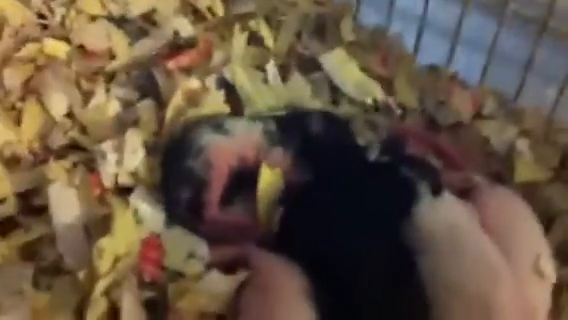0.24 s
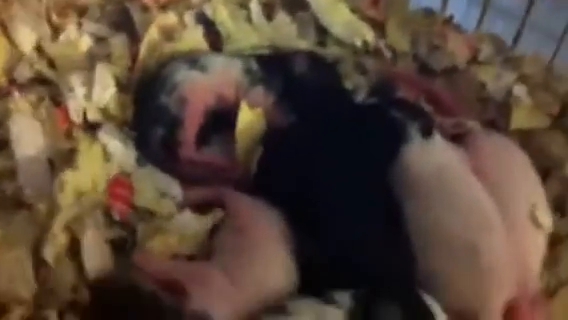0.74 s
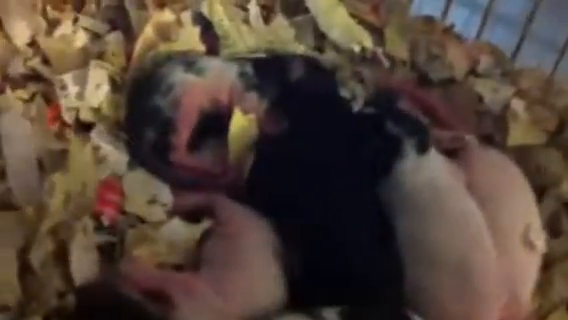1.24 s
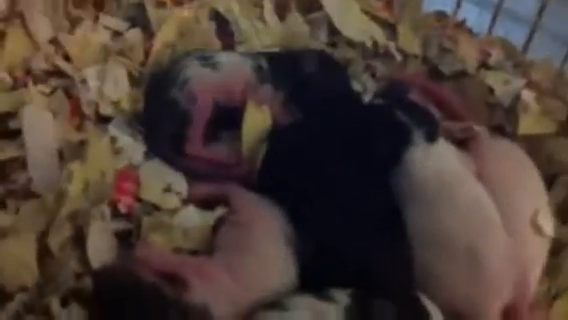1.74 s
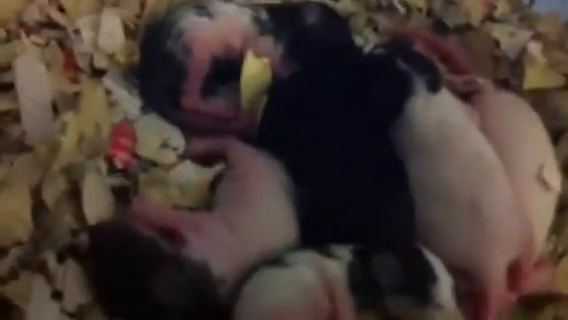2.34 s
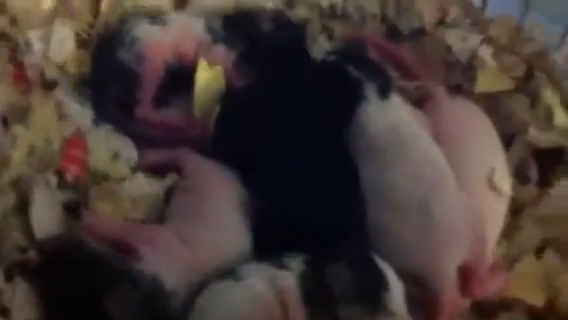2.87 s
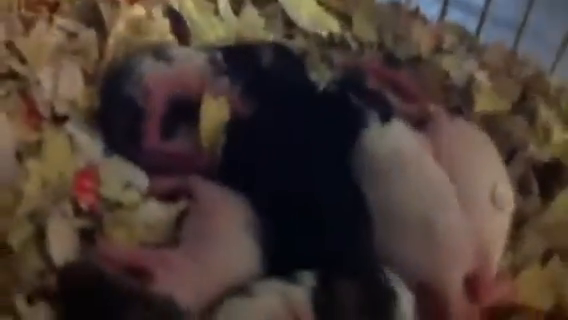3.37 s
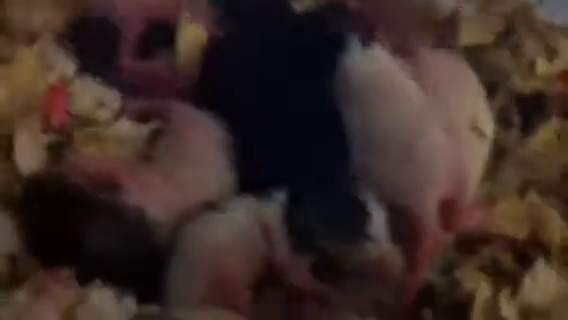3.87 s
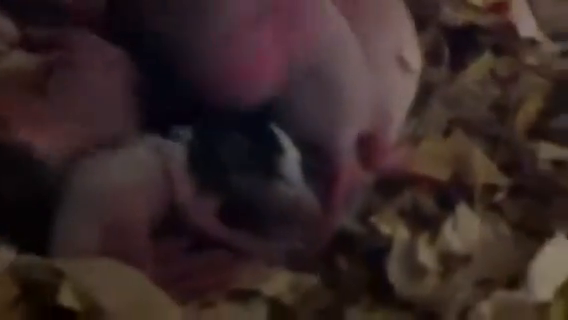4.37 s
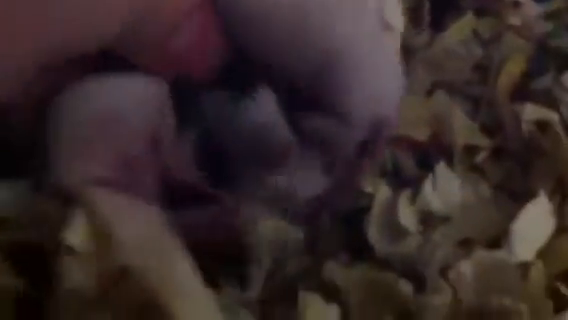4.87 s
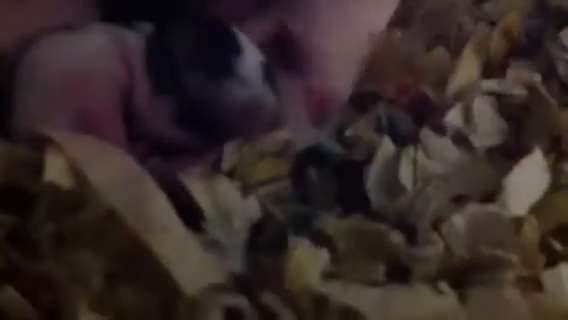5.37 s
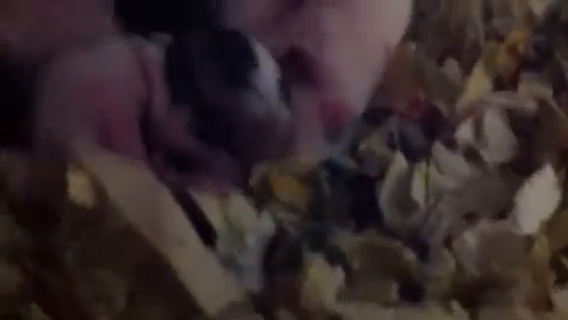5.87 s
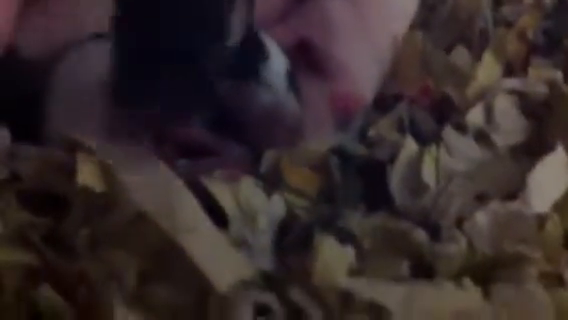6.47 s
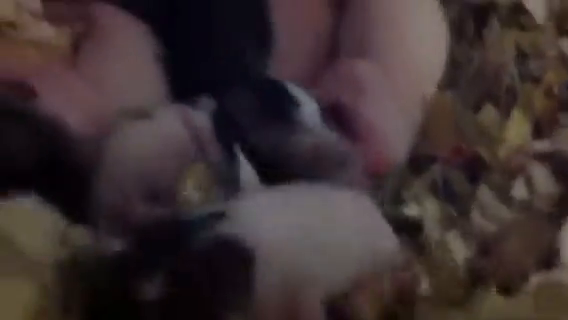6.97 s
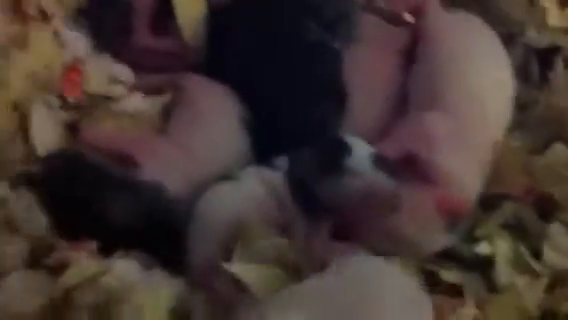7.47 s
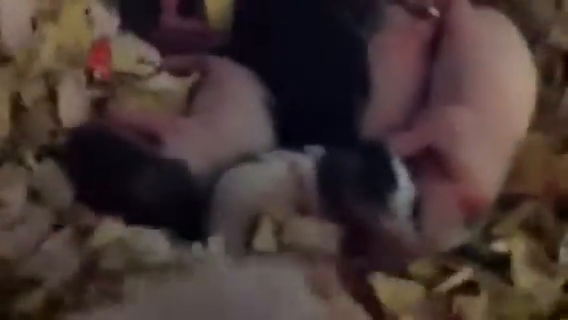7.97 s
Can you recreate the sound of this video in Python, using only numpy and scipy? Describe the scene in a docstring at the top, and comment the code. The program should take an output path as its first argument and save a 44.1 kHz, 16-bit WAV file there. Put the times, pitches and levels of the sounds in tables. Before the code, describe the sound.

Raspy little squeaks from a baby rat burst out around one and four seconds, amid papery scuffs, soft hand rubs, thuds and faint room drone.

```python
"""Four hoarse squeals of a rat pup, each breaking upwards in pitch, over a nest of rustling paper.
The voice mixes a clear harmonic tone with rasping, chaotic closures and air, coloured by the throat.
Shredded paper stirs and scuffs as tiny slips, among dry clicks of noise; a hand rubs with hollow rings.
Dull knocks strike the resonances of the wire cage floor, and a low steady hum drones in the small room."""
import sys
import numpy as np
from scipy import signal
from scipy.fft import rfft, irfft, next_fast_len
from scipy.io import wavfile
from scipy.ndimage import uniform_filter1d

SR = 44100
rng = np.random.default_rng(int(sys.argv[2]) if len(sys.argv) > 2 else 0)


def persist_wave(psi):
    """Save psi, clipped to +-1, as 16-bit WAV."""
    counts = np.round(np.clip(psi, -1, 1) * 32767).astype(np.int16)
    wavfile.write(sys.argv[1], SR, np.atleast_2d(counts).T)


N = 362061
TIME = np.arange(N) / SR  # s

# squeals: [t/s, held/s, level/dB, swell/dB (negative starts loud), release/dB per s,
# low pitch f/Hz, top pitch f/Hz, glide/s, hoarseness/0-1 at the onset, at the break, at the top]
SQUEALS = [(1.057, 0.13, -24.5, 2, 677, 1050, 1241, .03, 0.94, 0.64, 0.86),
           (1.309, 0.1, -25.5, -2, 237, 1053, 1146, .014, 0.47, 0.97, 0.79),
           (3.897, 0.13, -22, 7, 901, 1078, 1258, .016, 0.72, 0.82, 0.73),
           (4.326, 0.17, -21, 10, 540, 992, 1201, .036, 0.83, 0.83, 0.43)]
# colour of the rasp in the throat: [f/Hz, level/dB per Hz]
RASP_COLOUR = [(500, -47), (780, -40.5), (950, -17.5), (1150, -25.5), (1580, -8.5), (2000, -14),
               (2450, -6.5), (3100, -3.5), (3900, -4.5), (4800, -2.5), (5800, -5.5), (7500, -11.5),
               (8300, -10), (11300, -11.5), (13000, -25), (15800, -24)]
# narrow throat resonances that flare: [f/Hz, width/Hz, level/dB]
THROAT_MODES = [(1510, 180, -27), (2900, 430, -0.5), (4460, 330, -15.5), (4900, 22, 2), (6820, 140, -0.5),
                (7360, 200, 1)]
# harmonics of the clear tone, from the first up: [level/dB]
HARMONICS_DB = [-26.5, -6.5, -1.5, 3, -6.5, -9, -15, -12.5, -11, -18.5]
ATTACK_S, ATTACK_DB, SWELL_S = 0.0092, 31, 0.018
BREAK_S, RELEASE_S = 0.038, 0.055  # the pitch stays low until the break
SLIP_HOARSENESS, SLIPS_PER_S = 0.059, 33  # chance slips between clear and hoarse
RELEASE_HOARSENESS = 0.49  # the voice frays as it dies


def squeal(start, held, full_db, swell_db, release, low_hz, top_hz, glide,
           hoarse_onset, hoarse_break, hoarse_top,
           waver=0.005, jitter=0.014, chaos=0.08, air_share=0.62, clarity_db=3.5):
    """The vocal folds slip between a clear tone and chaotic flapping, with air hissing through each opening."""
    age = TIME[:int((held + RELEASE_S) * SR)]
    size = len(age)
    dying = np.maximum(age - held, 0)
    level_db = full_db - ATTACK_DB * np.maximum(1 - age / ATTACK_S, 0)
    level_db = level_db - swell_db * np.exp(-age / SWELL_S) - release * dying

    # after the break, pitch and hoarseness glide together to their top values
    climb = 1 - np.exp(-np.maximum(age - BREAK_S, 0) / glide)
    pitch = low_hz + (top_hz - low_hz) * climb
    pitch = pitch * (1 + waver * wander(50, size))
    hoarse = np.interp(age, [0, BREAK_S], [hoarse_onset, hoarse_break])
    hoarse = hoarse + (hoarse_top - hoarse_break) * climb
    hoarse = hoarse + RELEASE_HOARSENESS * dying / RELEASE_S
    hoarse = np.clip(hoarse + SLIP_HOARSENESS * wander(SLIPS_PER_S, size), 0.02, 0.98)

    flutter_db, shake_db = 3.5, 1.3  # of each harmonic, of the whole voice
    cycles = np.cumsum(pitch * (1 + jitter * hoarse * wander(565, size))) / SR
    tone = np.zeros(size)
    for k, db in enumerate(HARMONICS_DB, 1):
        harmonic = np.sin(2 * np.pi * (k * cycles + rng.random()))
        tone += from_db(db + flutter_db * wander(49, size)) * harmonic

    # chaotic closures come early or late, each with its own force
    flaps = np.cumsum(pitch * np.exp(chaos * wander(600, size))) / SR
    closures = np.diff(np.floor(flaps), prepend=0) * rng.rayleigh(1, size)
    air = rng.standard_normal(size) * (2 + np.cos(2 * np.pi * flaps))
    rasp = np.sqrt(1 - air_share) * rms_one(closures - closures.mean())
    rasp = rasp + np.sqrt(air_share) * rms_one(air)

    clear_voice = from_db(clarity_db) * np.sqrt(1 - hoarse) * rms_one(tone)
    voice = clear_voice + np.sqrt(hoarse) * coloured(rasp, RASP_COLOUR)
    voice = evened(voice + flaring(voice, THROAT_MODES, depth_db=4, rate=30))
    out = np.zeros(N)
    out[int(start * SR) + np.arange(size)] = from_db(level_db + shake_db * wander(74, size)) * voice
    return out


# restlessness of the nest, as the level of the stirring paper, in four stretches: [t/s, level/dB]
UNREST = [
    [(0.0, -53.5), (0.242, -61), (0.576, -54), (0.71, -59), (0.888, -59), (1.0, -57.5)],
    [(1.65, -60), (2.07, -58.5), (2.35, -64), (3.16, -68), (3.66, -61.5), (3.85, -57)],
    [(4.72, -58), (5.072, -58), (5.208, -60), (5.916, -67), (6.0, -64.5)],
    [(6.05, -68), (6.26, -59), (6.67, -61), (6.89, -57.5), (7.54, -57.5), (8.2, -58)],
]


def unrest_level():
    """Join the stretches of unrest into one level curve in dB."""
    seconds, level_db = np.transpose(np.vstack(UNREST))
    return np.interp(TIME, seconds, level_db)


# strokes that swell and fade in the paper: [t/s at the top, level/dB, half length/s]
STROKES = [(.02, -51, 0.036), (.168, -52.5, 0.028), (2.06, -50, 0.015), (2.59, -57.5, 0.036),
           (3.07, -54, 0.024), (3.71, -52.5, 0.022), (5.14, -58.5, 0.051), (5.455, -49.5, 0.0066),
           (6.06, -55, 0.022), (6.365, -55, 0.018), (6.66, -53.5, 0.025), (6.775, -44, 0.027),
           (6.86, -51, 0.029), (7.0, -49, 0.025), (7.23, -51.5, 0.05), (7.55, -47, 0.022),
           (7.86, -52.5, 0.043), (8.155, -52.5, 0.044)]
# sudden scuffs of paper, before the trim and bite: [t/s, level/dB]
SCUFFS = [(0.307, -46), (0.4183, -43), (0.4833, -38), (0.637, -40), (0.7916, -43.5), (0.9472, -40),
          (2.0827, -41.5), (2.248, -40.5), (2.401, -38.5), (2.733, -39.5), (2.8912, -40), (3.2246, -38),
          (3.3802, -40.5), (3.553, -46), (3.7793, -51), (5.055, -41), (5.3837, -41.5), (5.4051, -42),
          (5.685, -44), (5.8653, -42.5), (6.2105, -43.5), (6.499, -45.5), (6.893, -40), (8.13, -38.5)]
# colour of the stirring paper: [f/Hz, level/dB per Hz]
STIR_COLOUR = [(590, -8.5), (1000, -8.5), (1270, 0), (1460, 0), (3070, -0.5), (4380, 1), (5520, -1),
               (7120, 0), (8870, 0), (13300, -3), (15800, -2.5)]
# colour of the scuffs: [f/Hz, level/dB per Hz]
SCUFF_COLOUR = [(880, -39), (1500, -2), (2180, -2.5), (2580, -8), (4350, 0.5), (5450, -3), (9190, -1.5),
                (12000, -9.5), (15800, -10)]
# resonances of single shreds: [f/Hz, width/Hz, level/dB]
SHRED_MODES = [(3450, 210, -24.5), (4300, 170, -3.5), (5980, 140, -1), (7020, 360, 0), (8700, 210, -16.5),
               (9230, 530, -2.5), (11740, 270, 3.5)]
SCUFF_T60_S = 0.21
SCUFF_BITE_DB, SCUFF_BITE_S = 3, 0.0054  # a scuff bites hardest as it begins


def paper(scuff_trim_db=-10, rise_s=0.00098):
    """Shreds slide over each other in a stir and slow strokes; sudden scuffs set single shreds ringing."""
    sliding_power = from_db(unrest_level()) ** 2 + swells(STROKES)
    scuff_power = np.zeros(N)
    for s, db in SCUFFS:
        start = int(s * SR)
        age = TIME[:min(SR // 2, N - start)]
        fade_db = SCUFF_BITE_DB * np.exp(-age / SCUFF_BITE_S) - 60 * age / SCUFF_T60_S
        envelope = from_db(db + scuff_trim_db + fade_db) * (1 - np.exp(-age / rise_s))
        scuff_power[start:start + len(age)] += envelope ** 2

    slips = grains(per_s=14000, size_db=3.5)
    slips = slips + flaring(slips, SHRED_MODES, depth_db=5, rate=8)
    scuffing = evened(coloured(slips, SCUFF_COLOUR), size=1024)
    stir = coloured(grains(per_s=14000, size_db=2.5), STIR_COLOUR) * from_db(2.3 * wander(25, N))
    return np.sqrt(sliding_power) * stir + np.sqrt(scuff_power) * scuffing


# tiny dry clicks, before the gain: [t/s, level/dB]
CLICKS = [(3.229, -49), (3.243, -52), (5.006, -48.5), (5.783, -49), (7.374, -44.5)]


def clicks(gain_db=5.0, decay_s=0.0014):
    """Each click is a burst of noise that dies within milliseconds."""
    out, age = np.zeros(N), TIME[:SR // 100]
    for s, db in CLICKS:
        start = int(s * SR)
        burst = np.exp(-age / decay_s) * rng.standard_normal(len(age))
        out[start:start + len(age)] += from_db(db + gain_db) * burst
    return out


# hand strokes through the nest: [t/s at the top, level/dB, half length/s, ring f/Hz]
RUBS = [(.917, -52.5, 0.0076, 1660), (.977, -57.5, 0.077, 1550), (2.674, -68, 0.019, 1360),
        (3.037, -61, 0.016, 1380), (3.288, -60.5, 0.011, 1630), (3.695, -51.5, .011, 1440),
        (3.785, -45.5, 0.0078, 1600), (3.815, -55.5, .05, 1560), (3.888, -54, .005, 1600),
        (4.105, -43, 0.0063, 1620), (4.168, -48, 0.02, 1670), (7.21, -54.5, 0.029, 3260)]
# resonances of the scrape: [f/Hz, width/Hz, level/dB]
SCRAPE_MODES = [(2290, 710, -11.5), (3550, 1700, -16)]
# colour of the soft shuffle: [f/Hz, level/dB per Hz]
SHUFFLE_COLOUR = [(200, -45), (420, 6), (650, -3), (930, 0.5), (1200, -9.5), (1700, -7), (2600, -18.5),
                  (5000, -26.5)]
SHUFFLE_DB, SHUFFLE_FOLLOWS = -64, 0.53  # level at mean unrest; share of its swing
SHUFFLE_LUMPS_DB, SHUFFLE_LUMPS_PER_S = 5, 6.1  # it comes in uneven lumps


def hand(ring_q=4.0, scrape_db=-3.0):
    """Skin rubs through the nest, each stroke with a hollow ring of its own, over a soft low shuffle."""
    slips, catches, shifts = (grains(per_s=3000, size_db=2.2) for _ in range(3))
    scrape = from_db(scrape_db) * rms_one(ring(catches, SCRAPE_MODES))
    unrest_db = unrest_level()
    shuffle_db = SHUFFLE_DB + SHUFFLE_FOLLOWS * (unrest_db - unrest_db.mean())
    shuffle_db = shuffle_db + SHUFFLE_LUMPS_DB * wander(SHUFFLE_LUMPS_PER_S, N)
    out = from_db(shuffle_db) * coloured(shifts, SHUFFLE_COLOUR)
    for s, db, half, hz in RUBS:
        width_hz = hz / ring_q
        hollow = resonance(resonance(slips, hz, width_hz), hz, width_hz)
        out += np.sqrt(swells([(s, db, half)])) * (rms_one(hollow) + scrape)
    return out


# dull knocks: [t/s, knock level/dB, boom level/dB, contact low-pass f/Hz,
# crumpling level/dB, crumpling half length/s]
KNOCKS = [(.24, -35, -59, 420, -51, .009), (0.319, -59, -36.5, 397, -62, 0.017),
          (0.542, -37, -60, 1100, -52, 0.014), (.865, -50, -48, 700, -54, 0.042),
          (1.369, -40, -55, 600, -48.5, 0.014), (1.932, -20.5, -38, 1620, -46, 0.0088),
          (2.279, -30.5, -47, 1610, -57, .008), (3.284, -57, -49, 500, -63, 0.018),
          (3.576, -28.5, -30, 1160, -48, 0.0059), (6.778, -26.5, -40.5, 745, -50, 0.0086),
          (7.128, -47, -35.5, 1200, -51, 0.012), (7.28, -22.5, -60, 1400, -45.5, 0.032),
          (7.542, -26, -42, 1360, -36, 0.0088), (7.746, -36.5, -67, 794, -47.5, 0.0064),
          (8.147, -39, -50, 900, -46, 0.014)]
# resonances of the short knock: [f/Hz, width/Hz, level/dB]
KNOCK_MODES = [(295, 63, 8.5), (450, 140, 10.5), (801, 230, 9), (1510, 200, -3.5)]
# resonances of the longer boom: [f/Hz, width/Hz, level/dB]
BOOM_MODES = [(170, 23, 2), (228, 40, -15), (324, 28, -10)]
CRUMPLE_END_S = 0.009  # crumpling has mostly faded this long after the knock time


def knocks(give_s=0.00135, crush_hz=1300):
    """The bedding crumples, and the cage floor answers with a short knock and a longer boom."""
    crumple_power = swells([(s + CRUMPLE_END_S - half, db, half) for s, *_, db, half in KNOCKS])
    crumple = low_pass(ring(grains(per_s=980, size_db=2.0), KNOCK_MODES), crush_hz)
    out = np.sqrt(crumple_power) * rms_one(crumple)
    for s, knock_db, boom_db, contact_hz, *_ in KNOCKS:
        blow = from_db(knock_db) * strike(KNOCK_MODES, contact_hz)
        blow = blow + from_db(boom_db) * strike(BOOM_MODES, contact_hz)
        start = int((s + give_s) * SR)
        out[start:start + len(blow)] += blow[:N - start]
    # the light floor radiates no deep bass
    return signal.sosfilt(signal.butter(2, 110, "high", fs=SR, output="sos"), out)


# decay time of the room: [f/Hz, T60/s]
ROOM_T60 = [(200, 0.3), (2500, 0.27), (5000, 0.25), (14000, 0.19)]


def in_room(x, wet_db, echo_db=-10.5, build_s=0.0082, count=6):
    """Add quick echoes off the cage floor and a diffuse room dying band by band, at unit response energy."""
    t = np.arange(SR // 2) / SR
    edges, tail = np.geomspace(100, 18000, 9), 0
    for low, high in zip(edges, edges[1:]):
        band_pass = signal.butter(2, [low, high], "band", fs=SR, output="sos")
        band = signal.sosfilt(band_pass, rng.standard_normal(len(t)))
        t60 = at_hz(ROOM_T60, np.sqrt(low * high))
        tail = tail + band * np.exp(-np.log(1000) * t / t60)
    tail = tail * (1 - np.exp(-t / build_s))
    response = from_db(wet_db) * tail / np.linalg.norm(tail) + signal.unit_impulse(len(t))
    lags = (rng.uniform(0.001, 0.007, count) * SR).astype(int)
    response[lags] += from_db(echo_db) * rng.choice([-1, 1], count)
    return signal.fftconvolve(x, response / np.linalg.norm(response))[:N]


# colour of the low rush: [f/Hz, level/dB per Hz]
HUM_COLOUR = [(18, -61.5), (30, -37), (54, -33.5), (75, -22), (118, -4), (219, 4.5), (316, -10), (411, -4),
              (508, -19.5), (585, -11), (761, -26.5), (939, -16.5), (1120, -57), (1340, -32), (2000, -42.5),
              (2600, -40), (4400, -120)]
# droning resonances of the room: [f/Hz, width/Hz, level/dB]
DRONE_MODES = [(127.4, 6.2, -5.5), (168.2, 8.6, -6.5), (227.8, 15, 3), (288, 13.4, -0.5), (408, 14, 1),
               (443.6, 13, -3)]


def hum(rush_db=-56.5, drone_db=-60.5):
    """A low steady rush of noise, with a second noise droning in the resonances of the room."""
    rush = coloured(rng.standard_normal(N), HUM_COLOUR)
    drone = rms_one(ring(rng.standard_normal(N), DRONE_MODES))
    return from_db(rush_db) * rush + from_db(drone_db) * drone


def from_db(db):
    """Decibels to gain."""
    return 10 ** (np.asarray(db) / 20)


def rms_one(x):
    """Scale to unit rms."""
    return x / np.sqrt(np.mean(x ** 2) + 1e-20)


def at_hz(points, hz):
    """Read a table on a log-frequency axis."""
    known, values = np.transpose(points)
    return np.interp(np.log(np.maximum(hz, 1)), np.log(known), values)


def coloured(x, spectrum):
    """Shape a signal with a spectrum; rms 1."""
    size = next_fast_len(len(x))
    hz = np.arange(size // 2 + 1) * SR / size
    shaped = rfft(x, size) * from_db(at_hz(spectrum, hz))
    return rms_one(irfft(shaped, size)[:len(x)])


def wander(rate, size):
    """Smooth chance that changes about rate times a second; spread about 1."""
    r = np.exp(-2 * np.pi * rate / SR)
    noise = rng.standard_normal(size + SR // 2)  # the extra half second lets the filter settle
    return rms_one(signal.lfilter([1], [1, -2 * r, r * r], noise)[-size:])


def resonance(x, hz, width_hz):
    """A two-pole resonance with gain about 1 on top."""
    r = np.exp(-np.pi * width_hz / SR)
    feed = np.array([1, 0, -1]) * (1 - r * r) / 2
    return signal.lfilter(feed, [1, -2 * r * np.cos(2 * np.pi * hz / SR), r * r], x)


def ring(x, modes):
    """Resonances in parallel."""
    return sum(from_db(db) * resonance(x, hz, width) for hz, width, db in modes)


def flaring(x, modes, depth_db, rate):
    """Resonances that each swell and fade by chance."""
    out = np.zeros(len(x))
    for hz, width, db in modes:
        out += from_db(db + depth_db * wander(rate, len(x))) * resonance(x, hz, width)
    return out


def strike(modes, softness_hz):
    """One padded blow on a set of resonances; peak 1."""
    contact = low_pass(signal.unit_impulse(SR // 4) + 1e-18, softness_hz)
    blow = ring(contact, modes)
    return blow / np.abs(blow).max()


def swells(rows):
    """Power of bell-shaped strokes."""
    power = np.zeros(N)
    for s, db, half in rows:
        power += from_db(db) ** 2 * np.exp(-np.minimum(((TIME - s) / half) ** 2, 50))
    return power


def grains(per_s, size_db):
    """Tiny slips of uneven size at random moments; rms 1."""
    sizes = from_db(size_db * np.minimum(rng.exponential(1, N), 5))
    return rms_one((rng.random(N) < per_s / SR) * sizes * rng.choice([-1, 1], N))


def evened(x, size=128):
    """Hold the short-term level near 1."""
    return x / np.sqrt(uniform_filter1d(x * x, size) + 1e-12)


def low_pass(x, hz):
    """A steep low-pass."""
    return signal.sosfilt(signal.butter(4, hz, fs=SR, output="sos"), x)


def scene():
    """Pup and handling with room echoes, mixed with the dry paper, clicks and hum."""
    pup = in_room(sum(squeal(*row) for row in SQUEALS), wet_db=-3.5)
    handling = in_room(knocks() + hand(), wet_db=-12.0)
    return (pup + handling + paper() + clicks() + hum())[None]


def record(dry):
    """Cut the top steeply above 15850 Hz."""
    return signal.sosfilt(signal.ellip(12, 0.2, 80, 15850, fs=SR, output="sos"), dry)


dry = scene()
out = record(dry)
persist_wave(out)
```